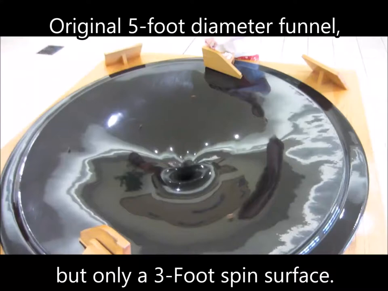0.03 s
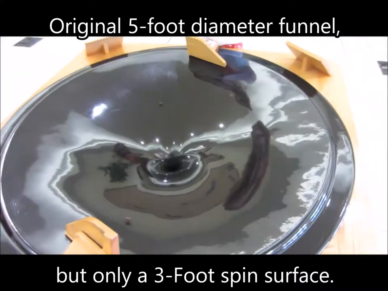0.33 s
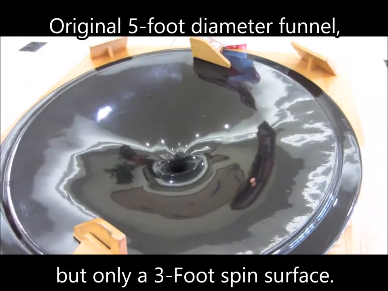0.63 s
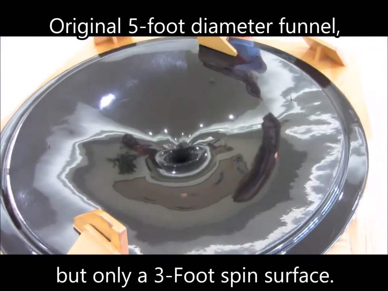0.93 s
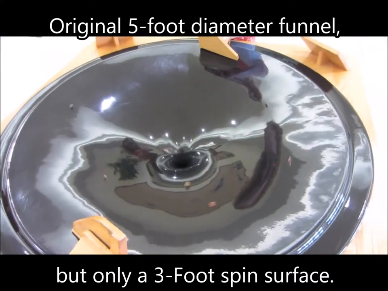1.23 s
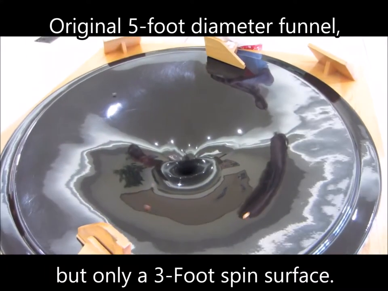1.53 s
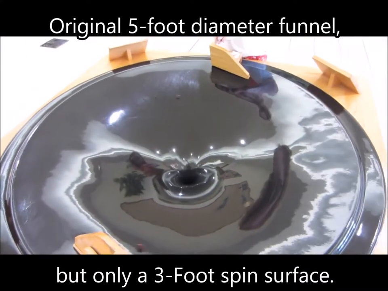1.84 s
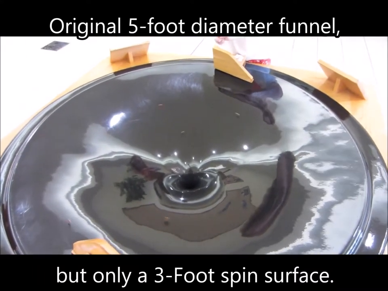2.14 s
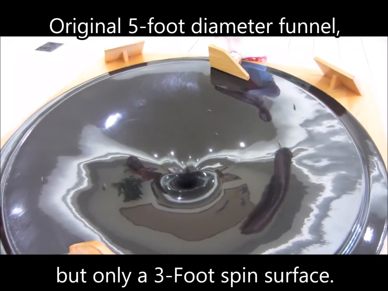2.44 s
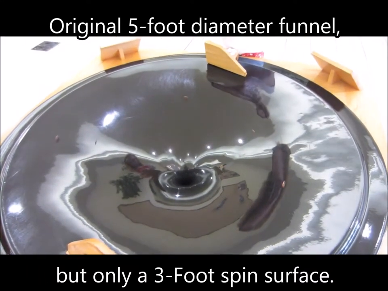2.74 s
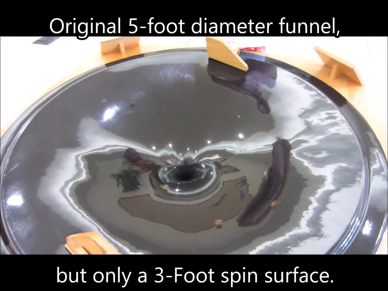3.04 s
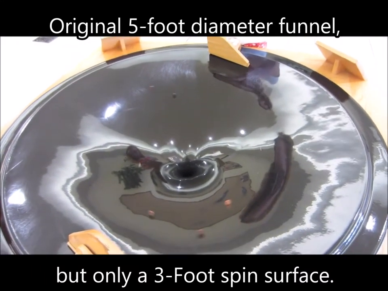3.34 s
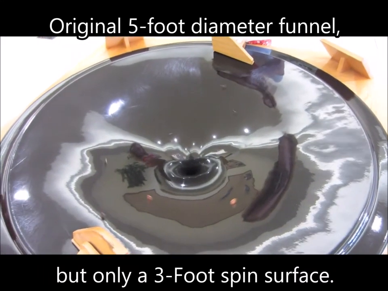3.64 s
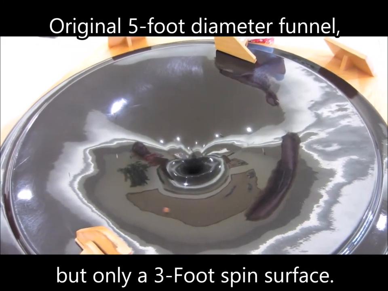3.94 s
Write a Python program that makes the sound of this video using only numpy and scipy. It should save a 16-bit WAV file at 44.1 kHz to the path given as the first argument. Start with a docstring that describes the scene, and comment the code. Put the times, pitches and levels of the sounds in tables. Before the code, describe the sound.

Close to a big plastic funnel in a room, circling coins make a continuous whooshing rumble. A sharp click comes early and a duller knock about halfway, while a low tone fades over a faint hum.

```python
"""Indoors, at the edge of a large plastic wishing-well funnel, several coins circle.
Their worn rims and specks on the track shake the shell into a roar whose hollow resonances swell and ebb.
Now and then a coin knocks, judders or scrapes its edge; one edge sings briefly, and the rims hiss faintly.
A low tone fades down over the first half. Mains hum and room air lie underneath."""
import sys
import numpy as np
from scipy import signal
from scipy.fft import rfft, irfft, next_fast_len
from scipy.io import wavfile
from scipy.ndimage import map_coordinates

SR = 44100
rng = np.random.default_rng(int(sys.argv[2]) if len(sys.argv) > 2 else 0)


def unload_wav(signal):
    """Save mono or channel-first audio to the path in sys.argv[1] as 16-bit WAV at rate SR, clipped to [-1, 1]."""
    wavfile.write(
        sys.argv[1],
        SR,
        np.round(np.clip(np.atleast_2d(signal).T, -1, 1) * 32767).astype(np.int16),
    )


N = 176400
TIME_S = np.arange(N) / SR


def amp(db):
    """Decibels to gain."""
    return 10 ** (np.asarray(db) / 20)


def unit(x):
    """Scale to rms 1."""
    return x / np.sqrt(np.mean(x ** 2) + 1e-20)


def along(points, hz):
    """Interpolate (frequency, value) points on a log axis."""
    point_hz, values = np.transpose(points)
    return np.interp(np.log(hz + 1), np.log(point_hz + 1), values)


def curves(rows):
    """One value per sample for each column after the time."""
    times_s, *columns = np.transpose(rows)
    return [np.interp(TIME_S, times_s, column) for column in columns]


def swell(peak_s, sigma_s):
    """Gaussian envelope, peak 1."""
    return np.exp(-.5 * ((TIME_S - peak_s) / sigma_s) ** 2)


def wobble(knots_per_s):
    """Smooth random curve."""
    return map_coordinates(rng.standard_normal(4096), [TIME_S * knots_per_s], mode="wrap")


def filtered(x, response):
    """Apply a frequency response to x."""
    size = next_fast_len(N + SR // 2)
    return irfft(rfft(x, size) * response(np.fft.rfftfreq(size, 1 / SR)), size)[..., :N]


def causal(gain):
    """Minimum-phase response with this gain."""
    cepstrum = irfft(np.log(np.maximum(gain, 1e-6)))
    cepstrum[1:len(cepstrum) // 2] *= 2
    cepstrum[len(cepstrum) // 2 + 1:] = 0
    return np.exp(rfft(cepstrum))


def noise(colour):
    """Two independent noises of one colour, rms 1."""
    return unit(filtered(rng.standard_normal((2, N)), lambda hz: amp(along(colour, hz))))


# roar before trim (time [s], body level [dB], treble level [dB])
ROAR_LEVELS = [(0.12, -25, -36.5), (0.35, -23.5, -37), (0.55, -22, -36), (0.95, -23, -35.5),
               (1.3, -23.5, -36), (1.65, -23, -36), (2.0, -24.5, -36), (2.2, -22, -34.5),
               (2.45, -22.5, -34), (2.85, -23, -35), (3.1, -23, -33), (3.35, -21, -34), (3.7, -22, -33),
               (4.0, -22, -34.5)]
def rolling(coins=6, bump_db=-4, flutter_db=.42, crossover_hz=1732, body_trim_db=-.16, treble_trim_db=.72):
    """The coins' uneven contact drives the shell; body and treble swell with their speed."""
    force = unit(sum(coin() for _ in range(coins))) + amp(bump_db) * bumps()
    force *= amp(flutter_db * wobble(knots_per_s=24))
    lowpass = lambda hz: 1 / (1 + (hz / crossover_hz) ** 6)
    body = unit(filtered(force, lambda hz: causal(shell_gain(hz)) * lowpass(hz)))
    treble = unit(filtered(force, lambda hz: causal(shell_gain(hz)) * (1 - lowpass(hz))))
    body_db, treble_db = curves(ROAR_LEVELS)
    return amp(body_db + body_trim_db) * body + amp(treble_db + treble_trim_db) * treble


def coin(base_turn_hz=13, base_lap_hz=.6, speed_swing=.16, lap_swing_db=1, rim_share=.52,
         ridges=125, whine_db=-21.5, whine_swing_db=7):
    """Contact force: the rim repeats each turn, faster on the oval lap's low side; its milling whines."""
    lap_start, lap_pace, turn_pace = rng.uniform(-1, 1, 3)
    lap = np.sin(2 * np.pi * base_lap_hz * (1 + .3 * lap_pace) * TIME_S + np.pi * lap_start)
    turn_hz = base_turn_hz * (1 + .25 * turn_pace) * (1 + speed_swing * lap)
    turns = np.cumsum(turn_hz) / SR
    profiles = rng.standard_normal((2, 4096))
    rim = np.array([np.interp(turns % 1, np.linspace(0, 1, len(p)), p) for p in profiles])
    ridge_phase = 2 * np.pi * ridges * turns
    whine_gain = amp(whine_swing_db * wobble(knots_per_s=3.9))
    whine = unit(whine_gain * (np.sin(ridge_phase) + np.sin(2 * ridge_phase)))
    grain = rng.standard_normal((2, N))
    contact = np.sqrt(rim_share) * unit(rim) + np.sqrt(1 - rim_share) * grain
    return amp(lap_swing_db * lap) * (contact + amp(whine_db) * whine)


def bumps(specks_per_s=330, spread_db=2.5):
    """Tiny random jolts from specks on the track."""
    hits = rng.random(N) < specks_per_s / SR
    strength = amp(spread_db * np.minimum(rng.exponential(size=N), 3))
    return unit(shell_ring(hits * strength * rng.choice([-1, 1], (2, N))))


# shell decay (frequency [Hz], T60 [s])
SHELL_DECAY = [(200, 0.54), (1000, 0.23), (4000, 0.022), (10000, 0.012)]
def shell_ring(jolts, ring_db=-2):
    """The shell's dense modes prolong each jolt, the low ones longest."""
    hz, age_s, spectra = signal.stft(rng.standard_normal((2, SR // 3)), SR, nperseg=256)
    fade = amp(-60 * age_s / along(SHELL_DECAY, hz)[:, None])
    _, tail = signal.istft(spectra * fade / np.linalg.norm(fade, axis=1, keepdims=True), SR)
    tail /= np.linalg.norm(tail[0])
    return jolts + amp(ring_db) * signal.fftconvolve(jolts, tail, axes=1)[:, :N]


# broad shell response (frequency [Hz], gain [dB])
SHELL_COLOUR = [(25, -31), (60, -20), (95, -14), (150, -11.5), (230, -4.5), (350, 0.0), (470, -3),
                (620, -3.5), (790, -2.5), (960, -5), (1250, -8), (1600, -9.5), (2100, -14.5), (2750, -19),
                (3500, -28), (5000, -33.5), (7000, -40), (8500, -46.5), (10000, -54.5), (11500, -76),
                (15000, -68.5)]
# prominent modes (centre [Hz], width [Hz], lift [dB])
SHELL_PEAKS = [(171, 28, 2.5), (250.5, 5.3, 2.5), (316, 8.9, 3.5), (372, 18, 1), (657, 31, 3),
               (706, 17, 1.5), (992, 20.4, 3), (1090, 118, 3), (3320, 560, 1.9)]
def shell_gain(hz):
    """How strongly the funnel radiates each frequency."""
    lift_db = sum(db / (1 + (2 * (hz - centre) / width) ** 2) for centre, width, db in SHELL_PEAKS)
    return amp(along(SHELL_COLOUR, hz) + lift_db)


# resonance envelopes (time [s], level [dB])
HOLLOW_LEVELS = [(.1, -39.5), (.4, -41), (.62, -35), (1.0, -31), (1.3, -35.5), (1.44, -29.5), (1.7, -34),
                 (2.05, -31.5), (2.32, -30.5), (2.6, -32.5), (2.88, -49), (2.97, -25), (3.12, -37.5),
                 (3.58, -29), (3.8, -36), (4.0, -28.5)]
MIDDLE_LEVELS = [(.1, -38), (.78, -37.5), (1.3, -39.5), (1.9, -45), (2.3, -36), (2.52, -34), (3.0, -39),
                 (3.5, -32), (3.8, -35.5), (4.0, -34)]
BOOM_LEVELS = [(.1, -51), (1.4, -47), (2.1, -45.5), (2.3, -34), (2.45, -45), (3.05, -43), (3.2, -30),
               (3.42, -42.5), (3.55, -34), (4.0, -40.5)]
def bowl():
    """The funnel's hollow ring, middle resonance and low boom."""
    return (resonance(HOLLOW_LEVELS, centre_hz=943, width_hz=140)
            + resonance(MIDDLE_LEVELS, centre_hz=563.8, width_hz=30.5)
            + resonance(BOOM_LEVELS, centre_hz=233, width_hz=90))


def resonance(levels, centre_hz, width_hz, drift_hz=13):
    """One bowl resonance swells and ebbs as coins pass, its pitch drifting a little."""
    level_db, = curves(levels)
    bandpass = lambda hz: 1 / (1 + (2 * (hz - centre_hz) / width_hz) ** 4)
    band = unit(filtered(rng.standard_normal((2, N)), bandpass))
    drift_rad = 2 * np.pi * np.cumsum(drift_hz * wobble(knots_per_s=7)) / SR
    return amp(level_db) * np.real(signal.hilbert(band) * np.exp(1j * drift_rad))


# knocks (time [s], relative strength [dB], treble tilt [dB/octave], T60 [s])
KNOCKS = [(0.6055, -2.5, 2.1, 0.01), (0.908, -21.5, 4, .02), (2.2564, -0.5, -1.7, .02),
          (3.0918, -12.5, 1.5, .014)]
# knock spectrum before tilt (frequency [Hz], gain [dB])
KNOCK_COLOUR = [(100, -17), (400, -2), (1500, -4), (2200, -5), (2800, 1.5), (3250, 0), (4200, -9),
                (5500, -12.5), (8000, -16), (10000, -26), (12000, -45), (15000, -39)]
def knocks(gain_db=11, tail_db=-10, tail_t60_s=.097, tilt_above_hz=2500):
    """Coins knock: a short crack, brighter or duller, and a faint tail from the shell."""
    age_s = np.arange(SR // 4) / SR
    octaves = lambda hz: np.log2(np.maximum(hz / tilt_above_hz, 1))
    out = np.zeros((2, N))
    for start_s, strength_db, tilt, t60_s in KNOCKS:
        fade = amp(-60 * age_s / t60_s) + amp(tail_db - 60 * age_s / tail_t60_s)
        crack = fade / np.linalg.norm(fade) * rng.standard_normal((2, len(fade)))
        placed = np.pad(crack, ((0, 0), (round(start_s * SR), N)))[:, :N]
        response = lambda hz: causal(amp(along(KNOCK_COLOUR, hz) + tilt * octaves(hz)))
        out += amp(strength_db + gain_db) * filtered(placed, response)
    return out


# judder spectrum (frequency [Hz], gain [dB])
JUDDER_SPECTRUM = [(80, -35), (220, -25), (350, 2), (600, -16), (1200, -10), (3000, -30), (9000, -70),
                   (12000, -110)]
def judder(level_db=-23):
    """A brief low swell as a knocked coin settles."""
    return amp(level_db) * swell(peak_s=2.278, sigma_s=.017) * noise(JUDDER_SPECTRUM)


# edge rubs (peak time [s], sigma [s], level [dB])
EDGE_RUBS = [(0.958, .06, -44), (2.406, .045, -46), (3.742, .12, -42)]
# rub spectrum (frequency [Hz], gain [dB])
RUB_COLOUR = [(1000, -41), (2200, -7), (3000, 4), (4000, -9.5), (5500, -8), (8000, -19), (10000, -32),
              (12000, -48)]
def scrapes(grit_db=3.2):
    """A leaning coin briefly rubs its edge on the surface: a gritty swell."""
    envelope = sum(amp(db) * swell(peak_s, sigma_s) for peak_s, sigma_s, db in EDGE_RUBS)
    grit = amp(grit_db * wobble(knots_per_s=120))
    return envelope * unit(grit * noise(RUB_COLOUR))


def whistle(peak_s=.21, sigma_s=.06, top_hz=4700, sag=.11, level_db=-51):
    """The edge of a passing coin sings, rising and falling with its speed."""
    pitch_hz = top_hz / (1 + sag * ((TIME_S - peak_s) / sigma_s) ** 2)
    phase = 2 * np.pi * np.cumsum(pitch_hz) / SR + wobble(knots_per_s=150)
    return amp(level_db) * swell(peak_s, sigma_s) * np.sin(phase)


# hiss envelope (time [s], level [dB])
HISS_LEVELS = [(.1, -85), (.9, -83), (1.6, -86.5), (2.5, -77), (2.73, -79), (2.78, -68.5), (2.84, -84),
               (3.6, -77.5), (4, -80)]
# hiss spectrum (frequency [Hz], gain [dB])
HISS_COLOUR = [(9000, -43), (12300, -12.5), (13200, -5.5), (15200, -4), (16000, -8.5)]
def rim_hiss():
    """Very faint, very high hiss of metal rims sliding on the surface."""
    level_db, = curves(HISS_LEVELS)
    return amp(level_db) * noise(HISS_COLOUR)


# tone contour (time [s], pitch [Hz], level [dB])
TONE_CONTOUR = [(.1, 196, -33), (.55, 195.2, -29), (1.1, 197.2, -33), (1.47, 198, -34.5),
                (1.56, 196.8, -43), (1.85, 199.8, -43.5), (2.2, 197.2, -48)]
def low_tone(waver_db=1.35):
    """A wavering low tone fades, then stays faint."""
    pitch_hz, level_db = curves(TONE_CONTOUR)
    rms = amp(level_db + waver_db * wobble(knots_per_s=14))
    return np.sqrt(2) * rms * np.sin(2 * np.pi * np.cumsum(pitch_hz) / SR)


# hum partials (frequency [Hz], level [dB])
HUM_PARTIALS = [(60, -60), (120, -44.5)]
def mains_hum():
    """Steady mains fundamental and its octave."""
    return np.sqrt(2) * sum(amp(db) * np.sin(2 * np.pi * (hz * TIME_S + rng.random()))
                            for hz, db in HUM_PARTIALS)


# air spectrum (frequency [Hz], gain [dB])
AIR_COLOUR = [(20, -2.5), (30, -0.5), (42, -9), (70, -6), (200, -9.5), (1000, -26), (10000, -65.5),
              (15000, -64)]
def room_air(level_db=-54.5):
    """Steady low rush of the room."""
    return amp(level_db) * noise(AIR_COLOUR)


# left-right likeness (frequency [Hz], coherence [0-1])
COHERENCE = [(30, 0.59), (120, 0.99), (500, 0.97), (1000, 0.96), (2000, 0.96), (4000, 0.8), (10000, 0.84)]
# balance (frequency [Hz], left minus right [dB])
BALANCE = [(60, -3), (125, -5), (250, -4), (500, -3), (1000, -2), (2000, 0.5), (4000, 2), (8000, 3.5),
           (12000, -2)]
# phase difference (frequency [Hz], left lead [rad])
PHASE_LEAD = [(20, 0), (500, 0.01), (1550, 0.58), (3100, 0.26), (9000, .1)]
def microphones(spread, centred):
    """A close pair hears nearly the same signal, the bass leaning to the right."""
    angle = lambda hz: np.arccos(along(COHERENCE, hz)) / 2
    mid, side = filtered(spread, lambda hz: np.array([np.cos(angle(hz)), np.sin(angle(hz))]))
    mid = mid + centred
    split = np.array([[.5], [-.5]])
    response = lambda hz: amp(split * along(BALANCE, hz)) * np.exp(1j * split * along(PHASE_LEAD, hz))
    return filtered(np.array([mid + side, mid - side]), response)


def scene():
    """Coins, funnel and room in stereo."""
    spread = rolling() + bowl() + scrapes() + knocks() + judder() + rim_hiss() + room_air()
    centred = mains_hum() + low_tone() + whistle()
    return microphones(spread, centred)


def record(dry, start_s=.1055, top_hz=15800):
    """The sound cuts in from silence, band-limited."""
    return filtered(dry * (TIME_S > start_s), lambda hz: hz < top_hz)


dry = scene()
out = record(dry)
unload_wav(out)
```